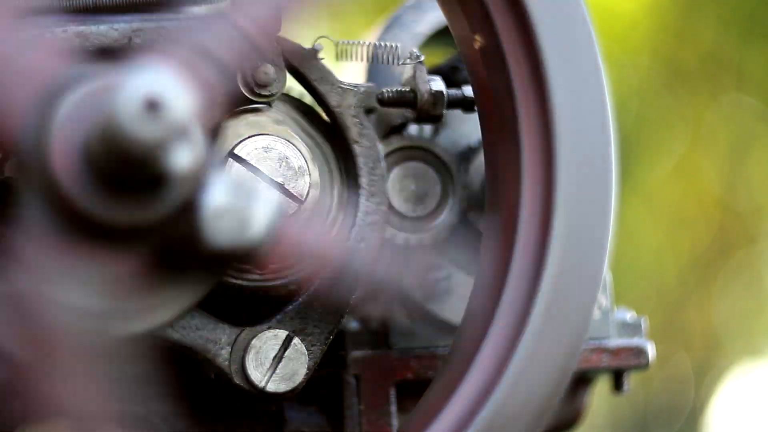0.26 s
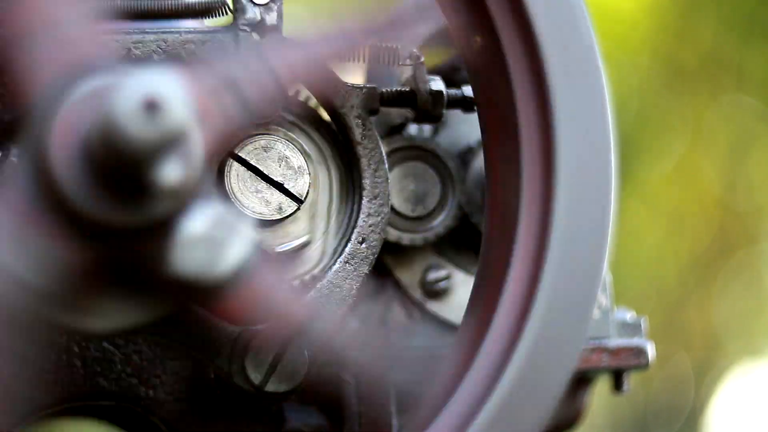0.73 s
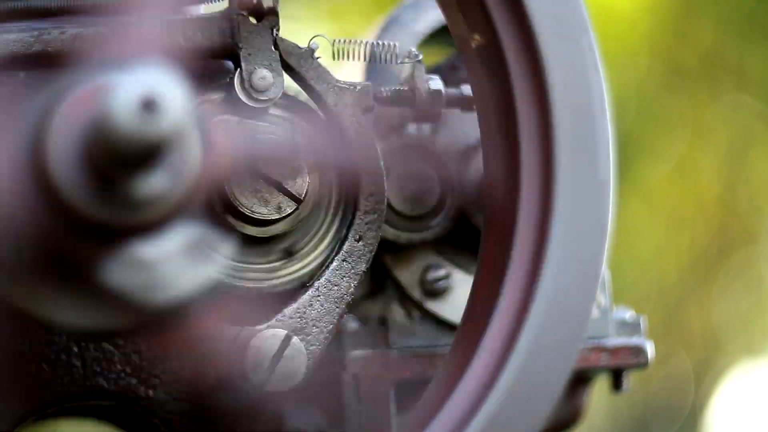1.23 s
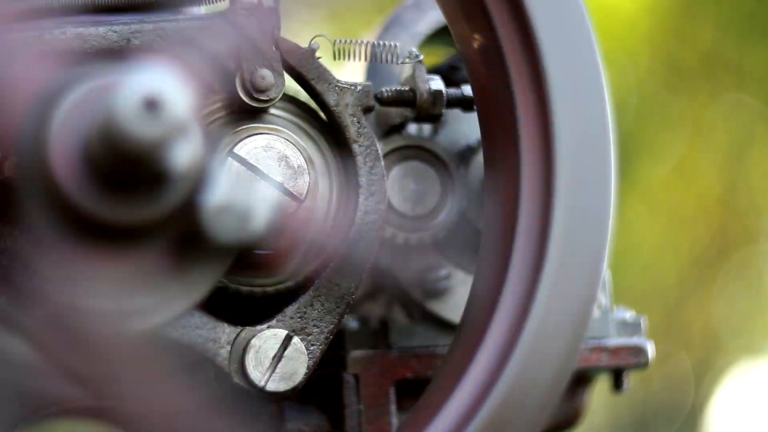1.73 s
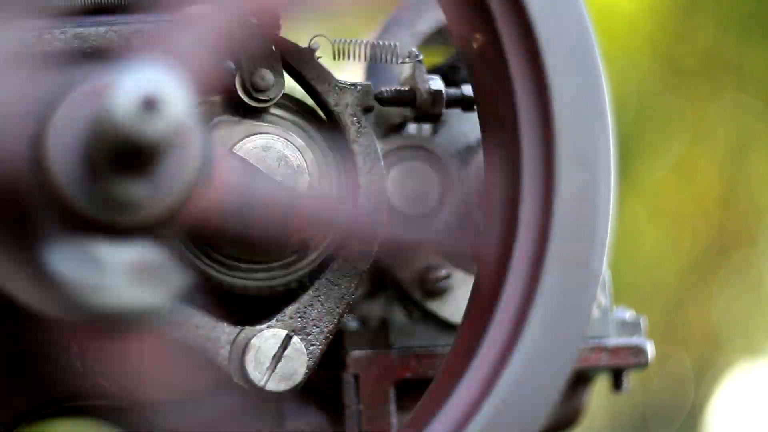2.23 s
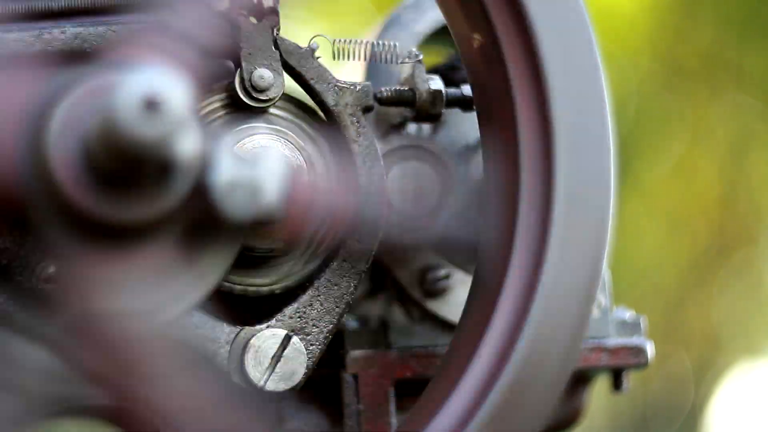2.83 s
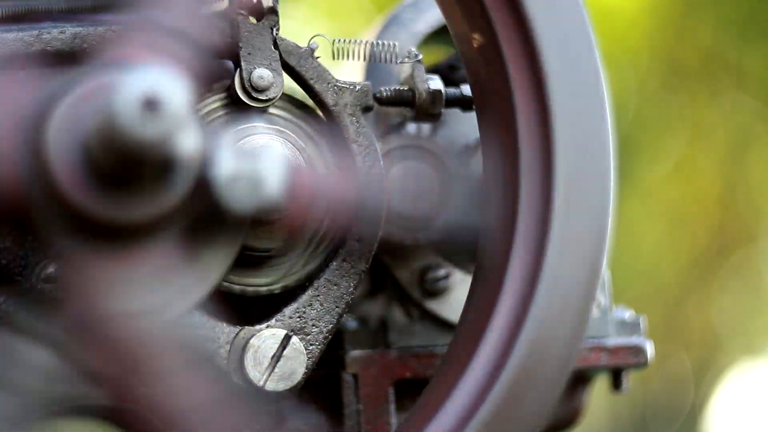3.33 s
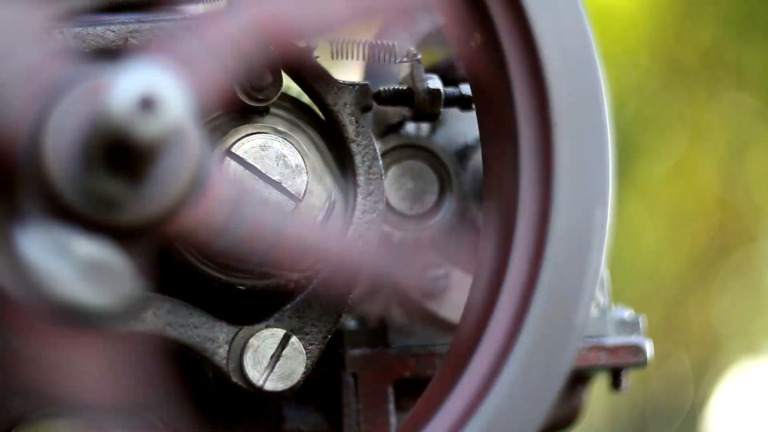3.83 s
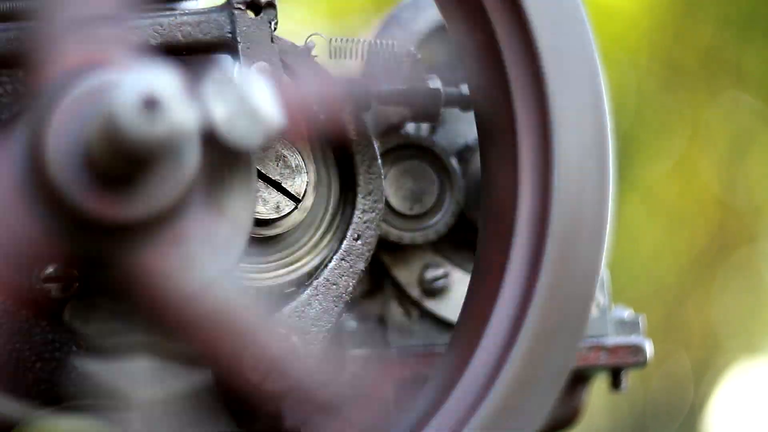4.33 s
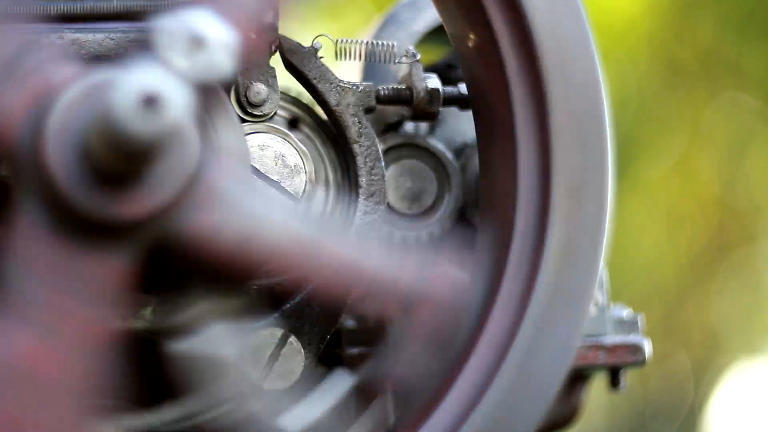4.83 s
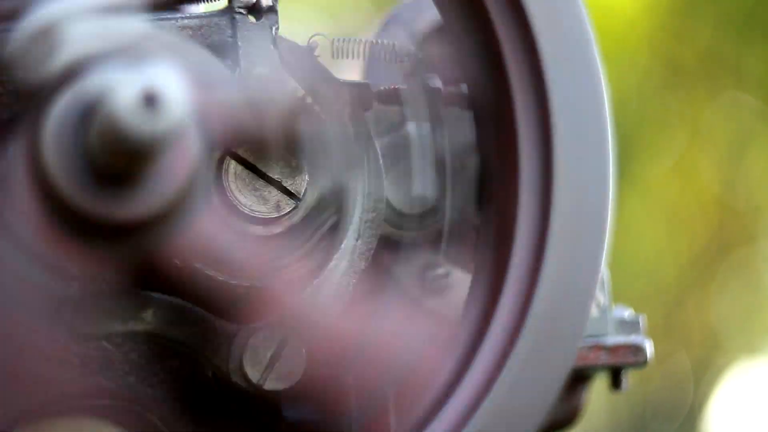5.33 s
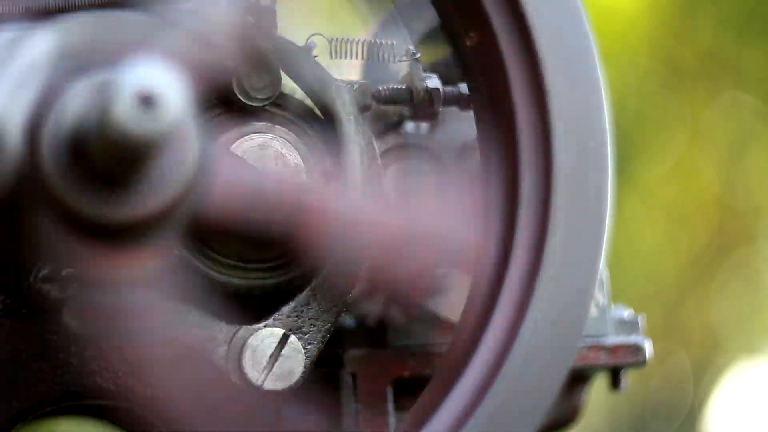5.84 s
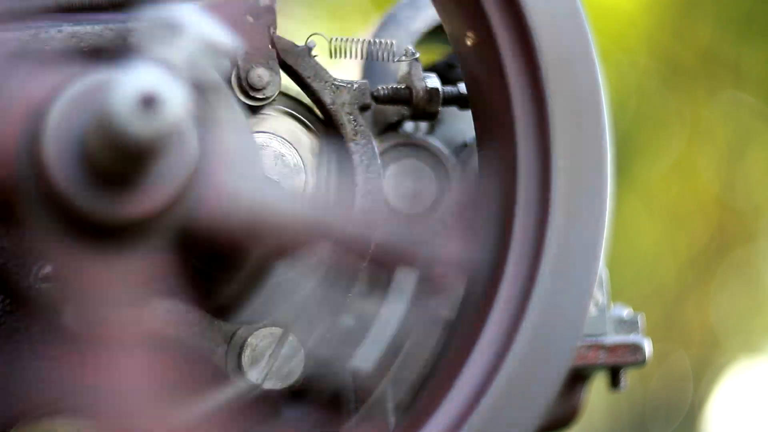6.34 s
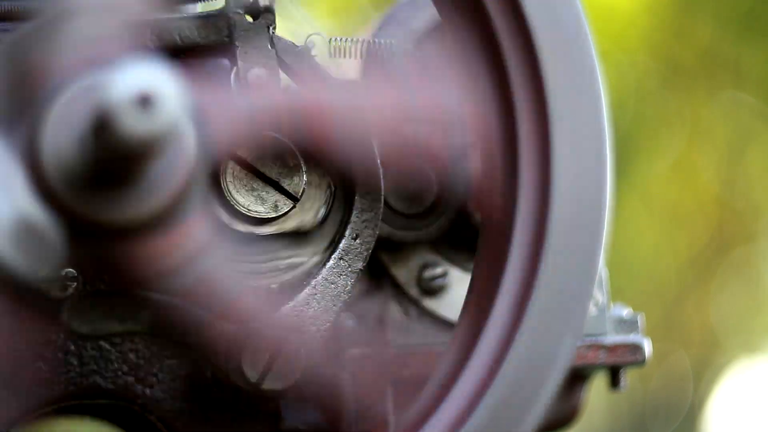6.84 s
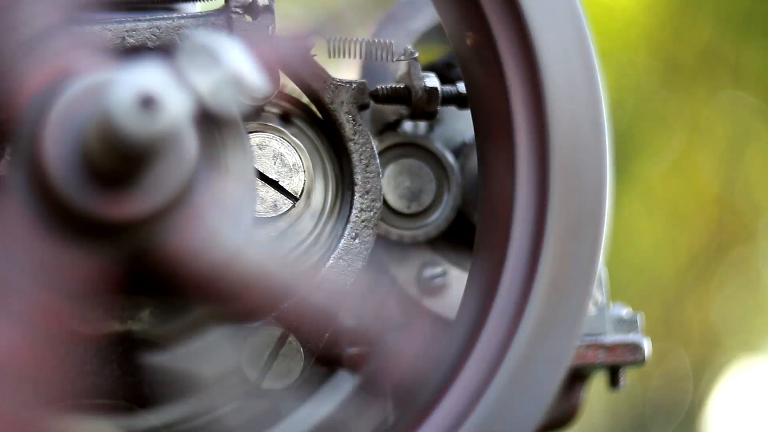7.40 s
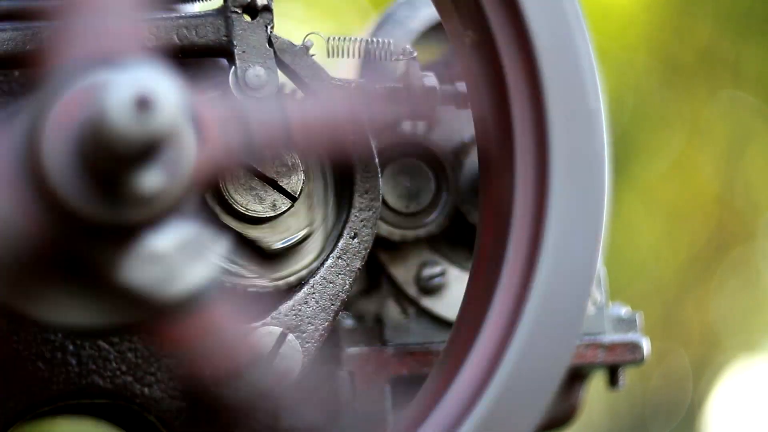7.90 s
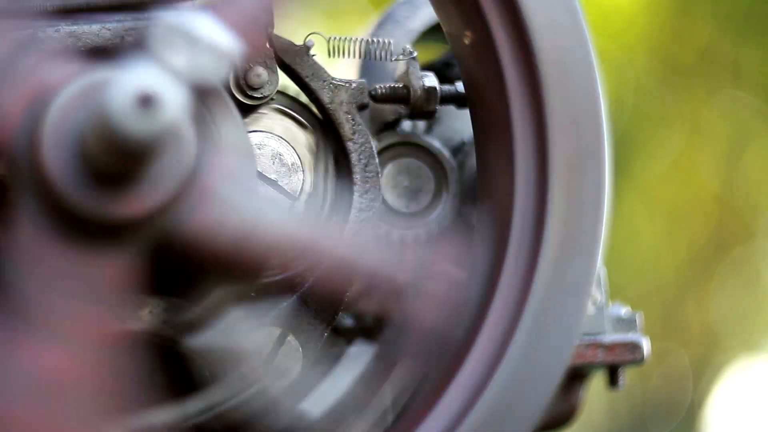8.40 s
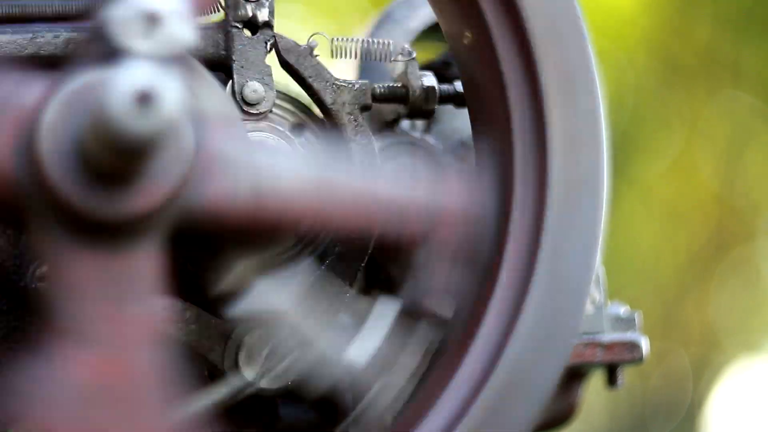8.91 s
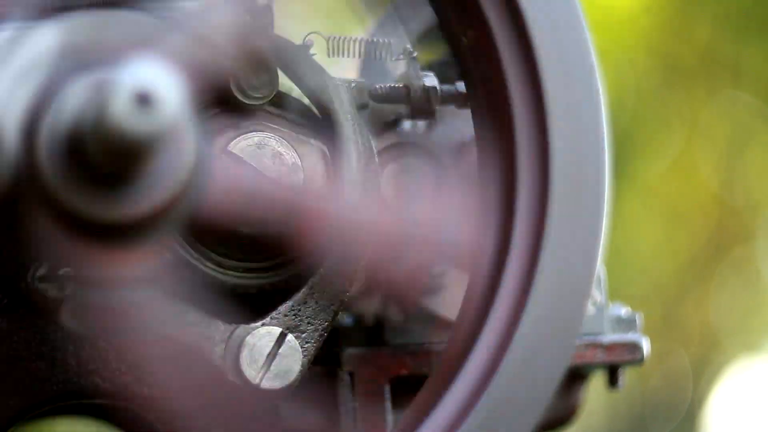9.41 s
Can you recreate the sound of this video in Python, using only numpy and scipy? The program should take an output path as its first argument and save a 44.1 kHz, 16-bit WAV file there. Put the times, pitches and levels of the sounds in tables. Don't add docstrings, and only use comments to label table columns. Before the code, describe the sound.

Outdoors, a phone microphone sits very near a small antique engine already coasting down. Bright, dry metal clacks come in rapid uneven pairs, with loose pins and gear teeth rattling and cast iron ringing briefly. At about 0.8 s the cylinder fires: a tight group of pops, a short gas rush, loud clacks and an exhaust thump, with the valve slamming near 0.9 s. From 1.05 s the clatter runs at roughly five and a half turns per second, each turn giving two strikes with rebounds, then gradually slows to nearer three by 4 s. Faint falling ring squeaks and increasingly audible low air puffs fill the gaps. The latch lets go with extra clacks, and it fires again at 4.8 s, slams, and coasts from 5.1 s, slowing again. A third firing comes at 8.9 s under a low wind gust, with a hard slam at 9.0 s, then fast clatter resumes.

```python
import sys
import numpy as np
from scipy import signal
from scipy.fft import rfft, irfft
from scipy.io import wavfile
from scipy.ndimage import uniform_filter1d

SR = 44100
rng = np.random.default_rng(int(sys.argv[2]) if len(sys.argv) > 2 else 0)


def boost_factor(decibels):
    exponent = np.asarray(decibels, float) / 20
    return 10 ** exponent


def generate_wav(sig):
    pcm = np.round(np.clip(np.atleast_2d(sig).T, -1, 1) * 32767).astype(np.int16)
    wavfile.write(sys.argv[1], SR, pcm)


N = 426006


def evened(x):
    return x / np.sqrt(np.mean(x ** 2) + 1e-20)


def read(points, hz):
    f, value = np.transpose(points)
    return np.interp(np.log(hz + 1), np.log(f + 1), value)


def add(mix, s, sound):
    part = mix[max(round(s * SR), 0):][:len(sound)]
    part += sound[:len(part)]


def coloured(gain):
    spectrum = rfft(rng.standard_normal(N))
    return evened(irfft(spectrum * gain(np.fft.rfftfreq(N, 1 / SR)), N))


# (roller first meets cam [s], cam speed then [turns/s])
COASTS = [
    (-2.9985, 5.5714),
    (1.0509, 5.5714),
    (5.0992, 5.5641),
    (9.1597, 5.5641),
]


def cam_at(angle, friction=.17396, drag_per_s=.1189, fast_turn_s=.18, slow_turn_s=.33):
    t = np.arange(0, 4.2, .001)
    found = []
    for s, speed in COASTS:
        turning = (speed + friction / drag_per_s) * np.exp(-drag_per_s * t) - friction / drag_per_s
        turned = (speed - turning - friction * t) / drag_per_s
        turn_s = 1 / np.interp(angle, turned, turning)
        slow = (turn_s - fast_turn_s) / (slow_turn_s - fast_turn_s)
        found.append((s + np.interp(angle, turned, t), slow))
    found = np.transpose(found, (1, 0, 2)).reshape(2, -1).T
    return found[found[:, 0] > 0]


def each_turn(table, angle, count, power=1):
    events = []
    for s, slow in abs(cam_at(angle + np.arange(count))):
        for soon, late, db, slow_db, hz in table:
            delay = soon + (late - soon) * slow ** power
            events.append((s + delay, db + (slow_db - db) * slow ** power, hz))
    return events


# (main pop [s], strength [dB])
FIRINGS = [
    (.7635, -31),
    (4.8123, -31),
    (8.8698, -31),
]


def heard(events, strokes):
    events = events + [(s + delay, db, hz) for s, _ in FIRINGS for delay, db, hz in strokes]
    return sorted(e for e in events if .02 < e[0] < N / SR)


LOBE, FREE_TURNS = .4704, 14
# (delay fast [s], delay slow [s], level fast [dB], level slow [dB], colour [Hz])
DROP = [
    (.004, .005, -37, -37, 7040),
    (.031, .060, -48, -49, 3350),
    (.062, .112, -57.5, -56.5, 4300),
]
STRIKE = [
    (.0025, .003, -39.5, -38.5, 2440),
    (.0065, .009, -39.5, -41.5, 4930),
    (.010, .017, -39.5, -34.5, 6400),
    (.028, .050, -40.5, -43, 3000),
    (.037, .067, -47, -43, 3200),
    (.068, .125, -71, -45, 4000),
]
DROP_REBOUND = [
    (.029, .083, -36.5, -46, 4400),
    (.043, .105, -54, -74, 8640),
    (.050, .115, -70, -70, 8800),
]
STRIKE_REBOUND = [
    (.034, .094, -35.5, -65.5, 4500),
    (.047, .115, -56.5, -74, 8800),
    (.055, .125, -63, -90, 8750),
]
# (cam angle [turns], delay [s], level [dB], colour [Hz])
LATCH = [(13, .020, -48, 4500), (14, -.0145, -39.5, 4700), (14, .001, -44, 7000), (14, .006, -39.5, 6300),
         (14, .019, -46, 5000), (14, .054, -46.5, 3000), (14, .107, -54, 4500),
         (14.4704, .003, -33.5, 4800), (14.4704, .009, -35, 6200), (14.4704, .018, -36, 5000),
         (14.4704, .048, -43, 3000), (14.4704, .066, -45, 2800), (14.4704, .121, -55, 3500),
         (15, .004, -33.5, 7000), (15, .059, -45, 2800), (15, .115, -54, 4000), (15.4704, .004, -36, 2050),
         (15.4704, .010, -35, 6600), (15.4704, .016, -31.5, 6800), (15.4704, .051, -40, 5000)]
# (delay [s], level [dB], colour [Hz])
STROKE = [
    (-.0105, -47, 1430),
    (.059, -32.5, 5800),
    (0.0716, -44.5, 5700),
    (.178, -32.5, 5900),
    (0.2247, -42, 5360),
]
# (time [s], level [dB], colour [Hz])
SLAMS = [
    (0.845, -43, 4800),
    (0.892, -35.5, 4530),
    (0.91, -30, 5670),
    (4.9488, -41.5, 2100),
    (4.9627, -30, 6070),
    (4.9817, -38, 4100),
    (8.998, -42.5, 3170),
    (9.0194, -28, 5700),
    (9.0418, -37, 5300),
]


def contacts(lag_power=1.5):
    events = each_turn(DROP, 0, count=FREE_TURNS)
    events += each_turn(STRIKE, LOBE, count=FREE_TURNS)
    events += each_turn(DROP_REBOUND, 0, count=FREE_TURNS - 1, power=lag_power)
    events += each_turn(STRIKE_REBOUND, LOBE, count=FREE_TURNS, power=lag_power)
    events += [(s + delay, db, hz) for angle, delay, db, hz in LATCH for s, _ in cam_at([angle])]
    return heard(events + SLAMS, STROKE)


def turn_starts():
    s, db, _ = np.transpose([e for e in contacts() if e[1] > -49])
    return s[(np.diff(s, prepend=-1) > .045) & (db > -41.7)]


def shaking(t60, hush_db, hush_s=0.018):
    s, db, _ = np.transpose(contacts())
    kicks, stills = np.zeros((2, N))
    np.add.at(kicks, (s * SR).astype(int), boost_factor(2 * db))
    stills[((turn_starts() - hush_s - .004) * SR).astype(int)] = 1
    still = signal.oaconvolve(stills, np.hanning(round(2 * hush_s * SR)), "same")
    energy = signal.lfilter([1], [1, -boost_factor(-120 / (t60 * SR))], kicks)
    return np.sqrt(energy) * boost_factor(hush_db * still)


# (frequency [Hz], density [dB per Hz])
AIR = [(18, -50), (30, -55), (153, 9.5), (287, 10.5), (461, 9.5), (584, -2.5), (1250, -4.5), (1760, -3.5),
       (4530, -2.5), (12600, -27.5), (16000, -62)]
# (time [s], level [dB])
WIND = [
    (0.0, -78),
    (1.852, -78.5),
    (2.02, -74),
    (4.98, -75),
    (5.54, -81),
    (7.18, -84),
    (8.93, -64.5),
    (9.31, -75.5),
    (9.66, -96),
]


def air(level_db=-60, follow=0.22):
    flutter = coloured(lambda hz: 1 / (1 + (hz / 25) ** 2))
    effort = evened(uniform_filter1d(shaking(0.5, -45.0), size=400) + 1e-4) ** follow
    hush = coloured(lambda hz: boost_factor(read(AIR, hz)) / (1 + (185 / (hz + 1)) ** 6))
    hush *= boost_factor(level_db + 3.33 * flutter) * effort
    s, db = np.transpose(WIND)
    gusts = boost_factor(np.interp(np.arange(N) / SR, s, db))
    return hush + gusts * coloured(lambda hz: (hz / 25) ** 2 / (1 + (hz / 25) ** 2) / (1 + (hz / 110) ** 2))


def nearby(x, t60_s=0.013, first_s=0.0034):
    t = np.arange(first_s, .2, 20 / SR)
    tail = np.zeros(round(.21 * SR))
    at = (t * SR).astype(int) + rng.integers(0, 20, len(t))
    tail[at] = rng.choice([-1., 1.], len(t)) * boost_factor(-60 * t / t60_s)
    tail = signal.lfilter([1], [1, -.4], tail)
    return signal.oaconvolve(x, tail / np.linalg.norm(tail))[:N]


def whirr(level_db=-66.5, high_hz=2720, low_hz=2150, begin=.52, end=.88):
    out, starts = np.zeros(N), turn_starts()
    for s, turn_s in zip(starts, np.minimum(np.diff(starts), .17)):
        hz = np.linspace(high_hz, low_hz, round((end - begin) * turn_s * SR))
        rub = uniform_filter1d(rng.standard_normal(len(hz)), size=60)
        squeak = (1.64 + 1.4 * evened(rub)) * np.sin(2 * np.pi * np.cumsum(hz) / SR)
        add(out, s + begin * turn_s, boost_factor(level_db) * squeak * np.hanning(len(hz)))
    return out


# (delay fast [s], delay slow [s], level fast [dB], level slow [dB], pitch [Hz])
DROP_PUFFS = [
    (.029, .055, -62.5, -38.5, 435),
    (.05, .081, -73, -40, 334),
]
STRIKE_PUFFS = [
    (.034, .062, -58.5, -38, 437),
    (.055, .086, -78, -40, 338),
]
# (delay [s], level [dB], pitch [Hz])
STROKE_PUFFS = [
    (.146, -44.5, 360),
    (.1745, -39.5, 680),
    (.319, -45.5, 403),
]


def puffs(swell_s=0.0053, fade_s=0.0044, turns=16):
    t, out = np.arange(-.015, .02, 1 / SR), np.zeros(N)
    breaths = each_turn(DROP_PUFFS, 0, count=turns) + each_turn(STRIKE_PUFFS, LOBE, count=turns - 1)
    for s, db, hz in heard(breaths, STROKE_PUFFS):
        db += 1.5 * rng.standard_normal()
        hz *= 1 + .025 * rng.standard_normal()
        swelling = np.exp(-(t / np.where(t < 0, swell_s, fade_s)) ** 2)
        turbulence = evened(uniform_filter1d(rng.standard_normal(len(t)), size=120))
        swelling *= 1 + .28 * turbulence
        cycles = hz * t * (1 - 3 * t) + rng.random()
        add(out, s + t[0], boost_factor(db) * swelling * np.cos(2 * np.pi * cycles))
    return out


# (frequency [Hz], density [dB per Hz])
CRACK = [(180, -20.5), (300, -9.5), (405, -28.5), (537, -18.5), (667, -10.5), (1690, -12), (4590, -5.5),
         (12700, -16), (16000, -36.5)]


def rattle(level_db=-53.0, per_s=150, cycles=5.45, tilt_db=-2.5, dulling=0.41, clump_db=4.5):
    shake, out = evened(shaking(0.12, 4.0)), np.zeros(N)
    clumps = boost_factor(clump_db * coloured(lambda hz: 1 / (1 + (hz / 150) ** 2)))
    for hz in np.geomspace(680, 12500, num=22):
        strength = np.minimum(rng.exponential(1, N), 3)
        taps = (rng.random(N) < per_s / SR) * boost_factor(3.2 * strength)
        turns = np.arange(round(5 * cycles * SR / hz)) * hz / SR
        ping = np.sin(2 * np.pi * turns) * turns * np.exp(-turns / (cycles / 3))
        colour = boost_factor(read(CRACK, hz) + tilt_db * np.log2(hz / 4500))
        ping *= colour * np.sqrt(hz) / np.linalg.norm(ping)
        drive = taps * clumps * shake ** (1 + dulling * np.log2(hz / 3000))
        out += signal.oaconvolve(drive, ping)[:N]
    return boost_factor(level_db) * evened(out)


# (frequency [Hz], level [dB], t60 [s])
FLYWHEEL = [
    (658, -51.5, .11),
    (1275, -49.5, .15),
    (2450, -52, .07),
    (3345, -45, .11),
    (12450, -52, .06),
]


def flywheel(x):
    t = np.arange(SR // 4) / SR
    ring = sum(boost_factor(db - 60 * t / t60) * np.sin(2 * np.pi * hz * t) for hz, db, t60 in FLYWHEEL)
    return signal.oaconvolve(x, ring)[:N]


FRAME_HZ = [215, 1020, 2050, 2450, 4250, 4650, 5250, 6000, 6780, 7500, 8530, 9490, 11000, 12450]
# (level [dB], t60 [s])
FRAME = [(-13, .05), (-3, .03), (-7, .02), (-7, .02), (-2, .016), (6, .02), (-2, .02), (-4, .014),
         (0, .015), (-8, .011), (-10, .011), (1, .015), (-11, .011), (-4, .022)]


def metal(hz, detune, spread_db, crack_db):
    db, t60 = np.transpose(FRAME)
    decay_hz = np.log(1000) / (2 * np.pi * t60)
    sign = (-1.) ** np.arange(len(db))
    modes = sign * boost_factor(db + spread_db) * decay_hz / (decay_hz + 1j * (hz[:, None] - FRAME_HZ * detune))
    crack = boost_factor(crack_db + read(CRACK, hz))
    return (modes.sum(-1) + crack) * (1j * hz / (170 + 1j * hz)) ** 3


def clack(db, centre_hz, rise_s=.0011, chatter_s=0.0024, tilt_db=8.0, focus_db=5.5, focus_oct=0.29):
    size = 4096
    t, hz = np.arange(size) / SR, np.fft.rfftfreq(size, 1 / SR)
    octave, lead = np.log2(hz + 50), 3 * rise_s
    shape = np.where(t < lead, np.exp(-((t - lead) / rise_s) ** 2), np.exp(-(t - lead) / chatter_s))
    chance = rng.standard_normal((2, len(FRAME)))
    bumps_db = 3.5 * evened(uniform_filter1d(rng.standard_normal(size), size=22))
    chatter = shape * rng.standard_normal(size) * boost_factor(bumps_db)
    colour_db = tilt_db * np.log2(centre_hz / 4500) * (octave - np.log2(4500)) / 2
    colour_db += focus_db * np.exp(-((octave - np.log2(centre_hz)) / focus_oct) ** 2)
    body = metal(hz, 1 + 0.009 * chance[0], 2.5 * chance[1], 2.75)
    sound = irfft(rfft(chatter) * body * boost_factor(colour_db), size)
    peak = np.sqrt(uniform_filter1d(sound ** 2, size=70).max())
    return lead + .0004, boost_factor(db) * sound / peak * boost_factor(-60 * (t / 0.12) ** 4)


def clacks(touch_db=-6., touch_ahead_s=.0031, touch_hz=5500, play_s=.0004, play_db=.8, play_oct=.07):
    out, starts = np.zeros(N), turn_starts()
    for s, db, centre_hz in contacts():
        late, strong, bright = rng.standard_normal(3) * (play_s, play_db, play_oct)
        lead, sound = clack(db + strong, centre_hz * 2 ** bright)
        add(out, s + late - lead, sound)
        if centre_hz > 4700 and s in starts:
            lead, sound = clack(db + touch_db, touch_hz, rise_s=.00025, chatter_s=.003)
            add(out, s - touch_ahead_s - lead, sound)
    return out


# (delay [s], level [dB], length [s])
POPS = [
    (-.036, -14, .005),
    (-.0212, -6, .0042),
    (0, -1, .0038),
    (.0185, -6, .0037),
    (.1755, -8, .0058),
    (.1872, -11, .0055),
]
# (delay [s], length [s], level [dB], centre [Hz], width [Hz])
RUSHES = [
    (-0.059, 0.054, -23, 160, 350),
    (0.00042, 0.015, -11.5, 960, 130),
    (-.04, 0.087, -22, 810, 2900),
    (.13, 0.071, -31, 360, 600),
    (.168, 0.018, -16.5, 480, 240),
]


def firing(crackle_db=-6.):
    out = np.zeros(N)
    for s, strength_db in FIRINGS:
        for delay, db, length in POPS:
            u = np.arange(0, 1.2 * length, 1 / SR) / length
            push = np.sin(2 * np.pi * u ** .7) * np.exp(-u ** 3 / 1.5)
            band = signal.butter(1, (900, 6000), "band", fs=SR)
            fizz = evened(signal.lfilter(*band, rng.standard_normal(len(u))))
            fizz *= boost_factor(crackle_db + db) * np.exp(-((u - .35) / 0.8) ** 2)
            add(out, s + delay, boost_factor(strength_db + db) * (push + fizz))
        for delay, length, db, hz, width in RUSHES:
            pipe = signal.iirpeak(hz, hz / width, SR)
            gas = signal.lfilter(*pipe, rng.standard_normal(8192))[2048:]
            gas = evened(gas[:round(length * SR)])
            add(out, s + delay, boost_factor(strength_db + db) * gas * signal.windows.tukey(len(gas), .6))
    return signal.lfilter(*signal.butter(1, 70., "high", fs=SR), out)


def scene():
    blows = clacks() + rattle()
    engine = blows + flywheel(blows) + puffs() + whirr() + firing()
    return (engine + boost_factor(-18.5) * nearby(engine) + air())[None]


def roll_off(x):
    return signal.sosfilt(signal.butter(12, 16670, fs=SR, output="sos"), x)


def record(dry):
    edge = signal.firwin(255, 16300, window=("kaiser", 9), fs=SR)
    limited = signal.oaconvolve(dry, edge[None], "same")
    rolloff = signal.butter(1, 40., "high", fs=SR, output="sos")
    return roll_off(signal.sosfilt(rolloff, limited))


dry = scene()
out = record(dry)
generate_wav(out)
```